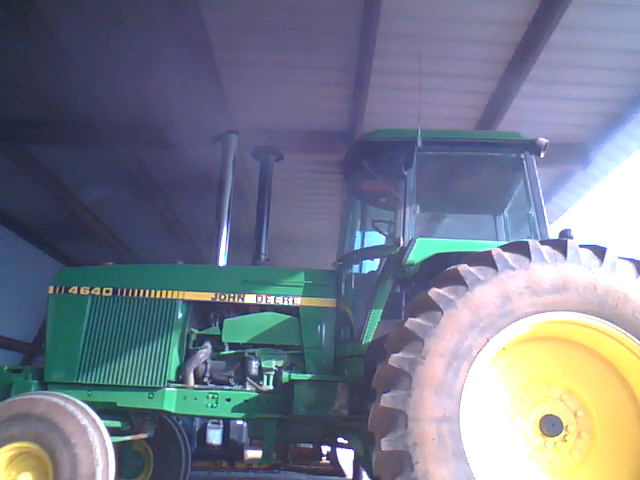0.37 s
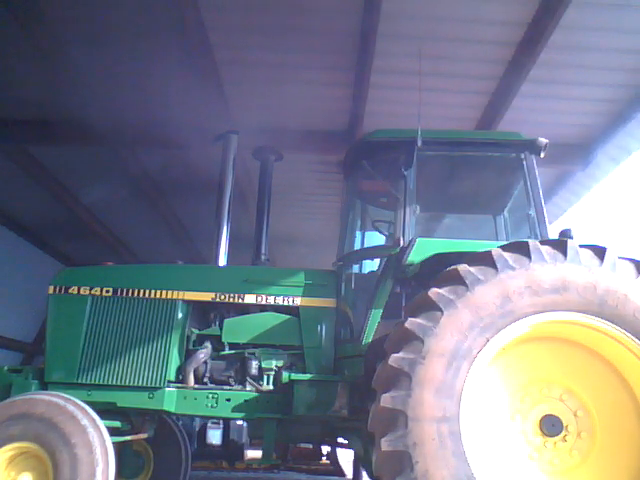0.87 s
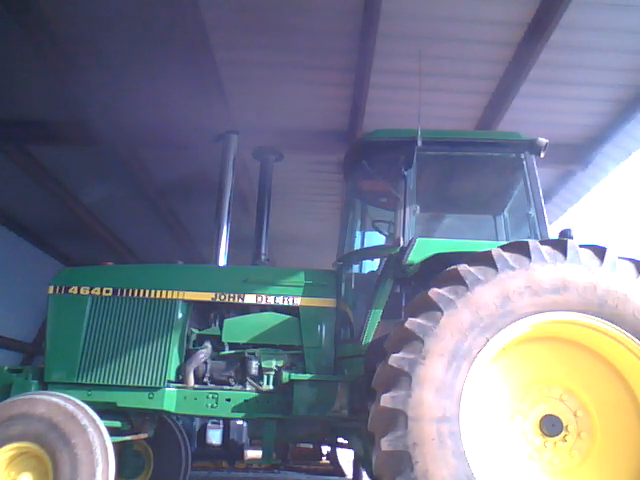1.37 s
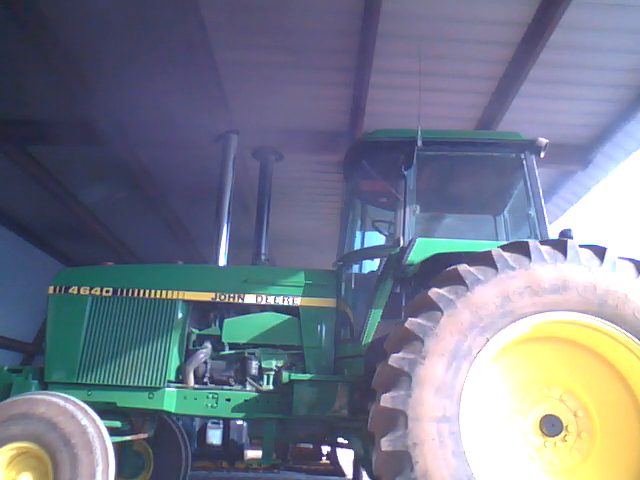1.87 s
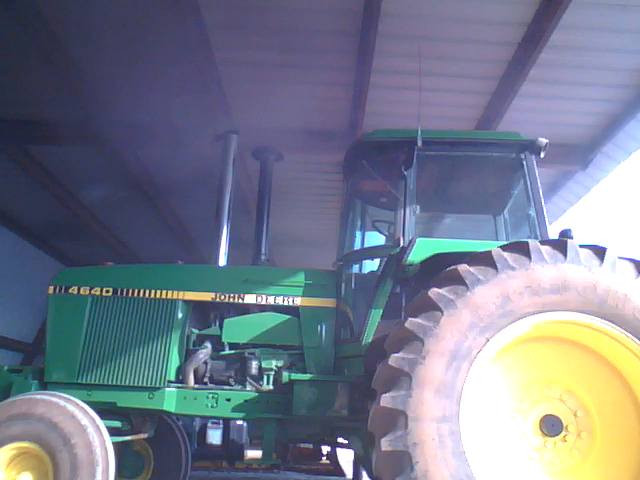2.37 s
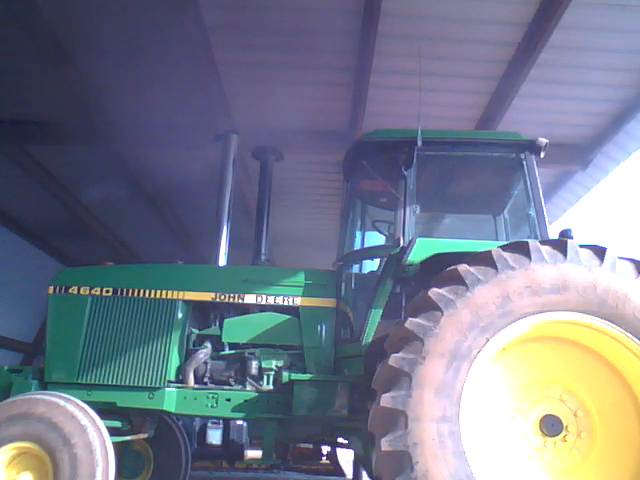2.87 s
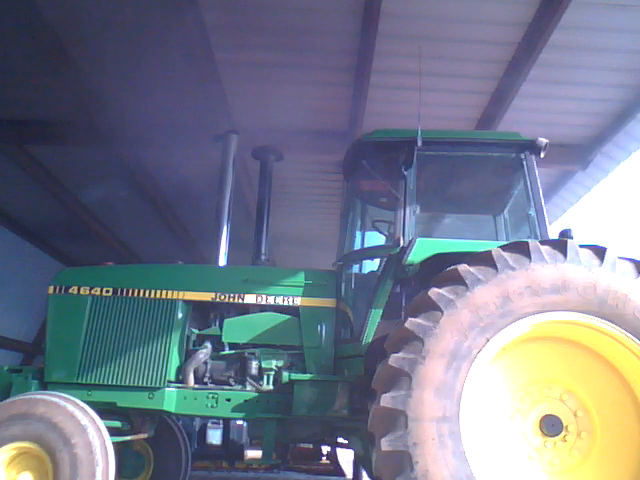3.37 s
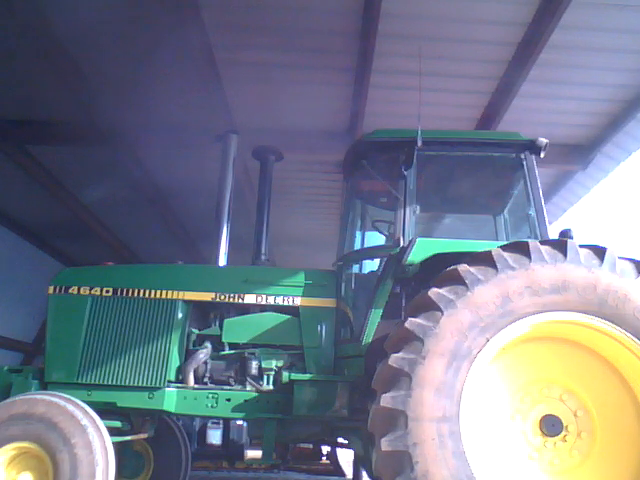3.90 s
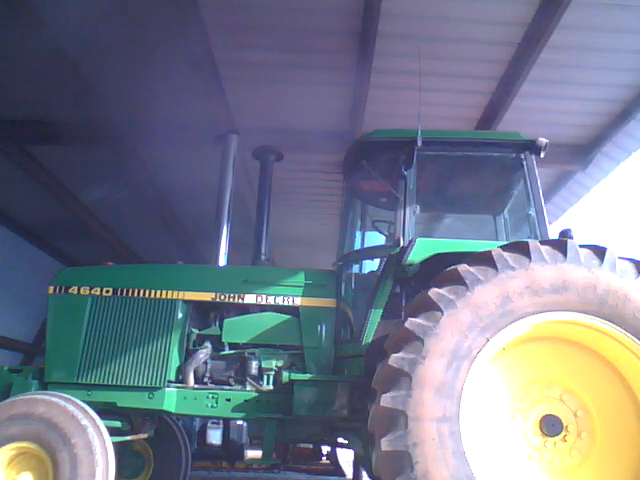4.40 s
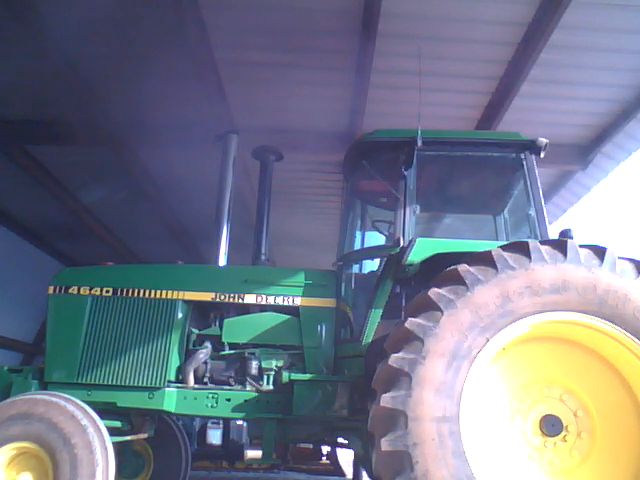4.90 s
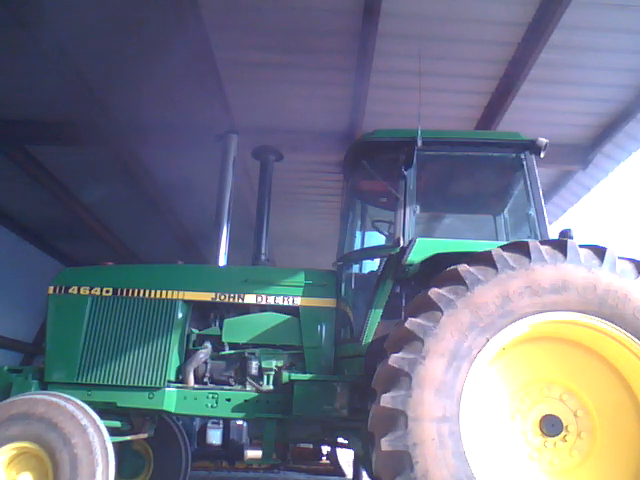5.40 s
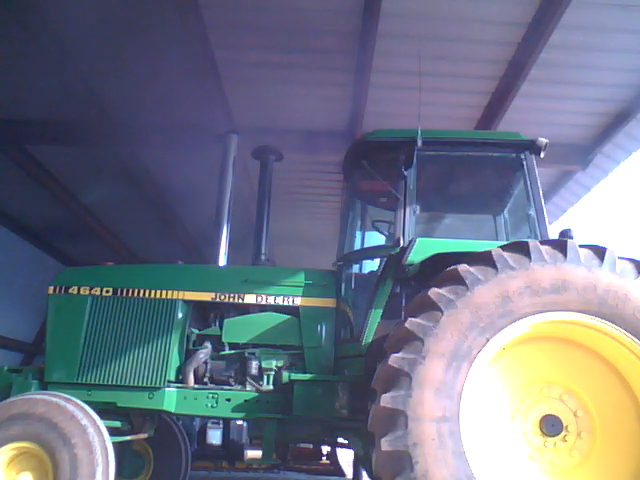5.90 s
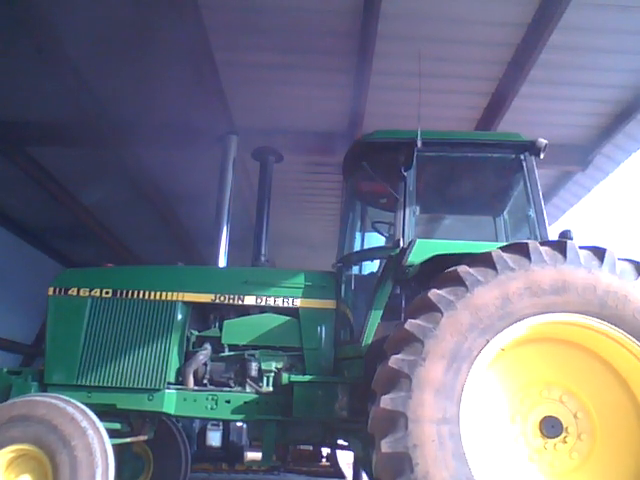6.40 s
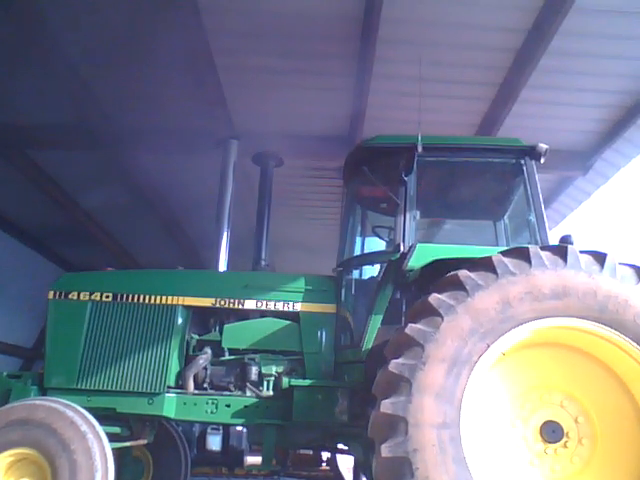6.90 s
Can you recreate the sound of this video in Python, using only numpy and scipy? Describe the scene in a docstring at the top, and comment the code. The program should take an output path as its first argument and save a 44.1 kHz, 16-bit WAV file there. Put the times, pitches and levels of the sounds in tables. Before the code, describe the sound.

Close, continuous diesel tractor idle in a metal shed: lumpy low-mid thuds, rattling valve clatter, steady hum and whine, easing slightly near the end.

```python
"""A six-cylinder diesel tractor idles under a sheet-metal roof, heard at two close microphone ports.
From the start each engine cycle repeats the same blows on a ringing block, with noisy valve clatter,
exhaust and shaft tones, a gear whine, fan rush and the roof's answer. In the first three seconds the idle
quickens slightly and the whine grows, then the speed hunts a little; near six seconds the whine drops,
and the clatter is weaker to the end. A delayed cross-feed between the ports widens the sound."""
import sys
import numpy as np
from scipy import signal
from scipy.fft import rfft, irfft, next_fast_len
from scipy.io import wavfile
from scipy.ndimage import uniform_filter1d, map_coordinates

SR = 44100
rng = np.random.default_rng(int(sys.argv[2]) if len(sys.argv) > 2 else 0)


def generate_wav(sig):
    """Save sig (samples, or channels by samples) to the path in sys.argv[1] as 16-bit PCM at SR."""
    pcm = np.round(np.clip(np.atleast_2d(sig).T, -1, 1) * 32767).astype(np.int16)
    wavfile.write(sys.argv[1], SR, pcm)


def level_to_linear(level):
    """Convert decibel levels to linear amplitude factors, elementwise."""
    exponent = np.asarray(level, float) / 20
    return 10 ** exponent


N = 309537

# All levels are those of the parts, before the two ports are formed.
# crankshaft speed, hunting a little under the governor: time_s, speed_rpm
SPEED = [(0, 748.32), (2.3, 750.3), (2.9, 757.86), (3.5, 754.23), (4.55, 759.58), (5.1, 754.04),
         (5.8, 758.37), (7.2, 757.83)]
START_DEGREES, IDLE_RPM = -9, 754  # crank angle at the start; speed that counts as plain idle
# slow swell of the engine, before each source's own offset: time_s, body_db, clatter_db
SWELL = [(0, -16, -32), (1.0, -17, -32.5), (1.9, -17, -32), (3.1, -17, -32), (4.2, -16.5, -32),
         (5.4, -16.5, -31), (6.3, -17, -33.5), (6.75, -15.5, -34), (7.02, -16.5, -36)]
BODY_FLUTTER_DB, CLATTER_FLUTTER_DB = 0.5, 1  # random unevenness on top of the swell
# blows within one cycle, relative levels: crank_degrees, thud_db (at 250 Hz), knock_db (at 520 Hz),
# clank_db (from 640 Hz up), place_along_block (0 to 1)
BLOWS = [(-12, 12, -9, 1, .02), (45, -8, -8, -5, .63), (88, 2, 14, 0, .135), (120, -3, -6, -5, .71),
         (170, -2, -4, -4, .37), (215, -4, -2, 3.5, .86), (290, 0, -5, 0, .19), (330, 3, -5, 4.5, .56),
         (400, -4, -5, -3, .92), (450, 3, -6, 1, .42), (520, 0, -5, -4, .78), (560, -5, 4, 1.5, .29),
         (660, -5, -3, -3, .48)]
THUD_DB_PER_RPM = 0.6  # the blow with the heaviest thud grows as the engine runs faster
# what the block, sump and bonnet ring with, relative levels: pitch_hz, level_db, fade_by_60_db_s
BLOCK_MODES = [(175, -23, 0.066), (220, -20, 0.03), (250, 3, 0.035), (286, 9, 0.05), (320, 7, 0.03),
               (403, 8, 0.02), (483, -4, 0.06), (502, 3, 0.085), (539, 1, 0.075), (585, 1, 0.041),
               (626.3, 3.5, 0.039), (689, 2, 0.058), (752, -1.5, 0.047), (805, 0, 0.034),
               (905.8, -4.5, 0.064), (1014, -4, 0.058), (1103.3, -3, 0.047), (1227, -13.5, 0.12),
               (1327, -9, 0.055), (1446, -6.5, 0.069), (1555, -12, 0.073), (1634, -10, 0.052),
               (1802, -12, 0.067), (1968, -25.5, 0.21)]
# valve and injector clatter, one burst a firing, relative levels: crank_degrees, level_db
BURSTS = [(-15, 2.5), (113, 0.5), (216, 4), (336.5, 2.5), (457, -3), (602, 1)]
# colour in which the clatter noise is heard, relative levels; the narrow hole near 2.8 kHz
# is not the clatter's own: pitch_hz, level_db_per_hz
CLATTER_AS_HEARD = [(400, -15), (1000, 8.5), (2000, 5), (2480, 4), (2800, -30), (2880, 1), (4000, -9.5),
                    (5000, -3.5), (6000, -4.5), (8000, -3), (10000, -11.5), (12300, -24.5), (13000, -21),
                    (13500, -31), (14000, -29), (15000, -33), (15300, -120)]
# steady tones locked to the engine: order_per_cycle, average_level_db_rms
STEADY_TONES = [(6, -47), (8, -60), (10, -63), (12, -38.5), (16, -64), (17, -64), (18, -39), (19, -60),
                (20, -52), (21, -52), (22, -41.5), (24, -40), (25, -55), (26, -37), (28, -40.5), (31, -41),
                (32, -34.5), (33, -42.5), (49, -37.5), (58, -41), (67, -47.5), (71, -48), (96, -46),
                (108, -41.5), (123, -39), (133, -40)]
# tones whose strength follows the speed as they slide along the block's resonances, one column each:
STRONG_ORDERS = [30, 66, 72, 92, 120]  # order_per_cycle
STRONG_DB = [-26, -33.5, -43, -38, -36.5]  # level_at_idle_db_rms
STRONG_DB_PER_RPM = [0.34, -0.4, 0.53, 0.64, 0.77]  # change_db_per_rpm
# average strength of the gear whine: time_s, level_db_rms
WHINE_LEVEL = [(0, -40.5), (2.2, -38.5), (2.7, -37.5), (5.5, -37.5), (6.1, -45), (7.02, -43)]
GEAR_ORDER = 373  # whine waves per engine cycle
# colour in which the fan noise is heard, relative levels; the narrow hole near 2.8 kHz
# is not the fan's own: pitch_hz, level_db_per_hz
FAN_AS_HEARD = [(20, -23), (60, -26), (120, -11), (250, 2), (600, -9.5), (1000, -2.5), (2000, -11.5),
                (2480, -12.5), (2800, -40), (2880, -16), (3450, -16.5), (4300, -20.5), (5000, -20),
                (6000, -19.5), (8000, -22), (9500, -35.5), (11000, -39), (13000, -49), (15000, -51),
                (15300, -120)]
# how long the roof's answer lasts: pitch_hz, fade_by_60_db_s
SHED_FADE = [(150, 0.7), (1000, 1), (4000, 0.35), (12000, 0.045)]
# difference of the two ports against their sum: pitch_hz, level_db, share_following_sum (0 to 1), phase_rad
PORTS = [(40, -24, .3, -.7), (200, -15.5, .4, -1.2), (500, -13.5, .55, -1.5), (1000, -5.5, .4, -1.7),
         (1700, -1, .3, -1.9), (3000, 0, .35, -2.4), (6000, 1.5, .5, -3), (8000, .5, .5, -3),
         (10000, 3.5, .5, -3), (13000, 1, .5, -3)]
CROSS_DELAY_S = 17 / 44100


def unit(x):
    """Scales a sound to rms 1."""
    return x / np.sqrt(np.mean(x ** 2) + 1e-20)


def along(points, hz):
    """Reads each column of a table by pitch, on a log axis."""
    f, *columns = np.transpose(points)
    return [np.interp(np.log(hz + 1), np.log(f + 1), column) for column in columns]


def curves(rows):
    """Gives one value per sample for each column after the time."""
    s, *columns = np.transpose(rows)
    return [np.interp(np.arange(N) / SR, s, column) for column in columns]


def wobble(rate):
    """Draws a smooth random curve through `rate` random points a second."""
    coarse = np.arange(0, N + 32, 32)
    points = rng.standard_normal(int(N * rate / SR) + 4)
    return np.interp(np.arange(N), coarse, map_coordinates(points, [coarse * rate / SR]))


def filtered(x, response):
    """Changes the strength and phase of each frequency by a complex response."""
    m = next_fast_len(N + 8192)
    return irfft(rfft(x, m) * response(np.fft.rfftfreq(m, 1 / SR)), m)[..., :N]


def hiss(colour, patchy_db):
    """Makes two unrelated coloured noises, rms 1, that share random patches of louder and softer sound."""
    grains = signal.stft(rng.standard_normal((2, N)), nperseg=128)[2]
    patches = rng.standard_normal(grains.shape[1:])
    for axis in (0, 1):  # smooth over pitch, then over time
        patches = uniform_filter1d(patches, size=5, axis=axis)
    patchy = signal.istft(grains * level_to_linear(patchy_db * unit(patches)), nperseg=128)[1][:, :N]
    return unit(filtered(patchy, lambda hz: level_to_linear(along(colour, hz)[0])))


def cycles():
    """Adds up the crank speed into engine cycles turned, two crank turns each."""
    return START_DEGREES / 720 + np.cumsum(curves(SPEED)[0]) / 120 / SR


def faster_rpm():
    """Speed above idle, averaged over a second."""
    return uniform_filter1d(curves(SPEED)[0], size=SR) - IDLE_RPM


def train(turned, degrees, db, jitter_s, scatter_db, drift):
    """Places one impulse each cycle at a crank angle; timing and size scatter, and both drift slowly too."""
    at = np.flatnonzero(np.diff(np.floor(turned - degrees / 720)))
    slow = drift * np.array([wobble(0.8)[at], wobble(0.58)[at]])
    late, size = rng.standard_normal((len(at), 2)).T + slow
    moved = np.clip(at + np.round(jitter_s * late * SR).astype(int), 0, N - 1)
    return np.bincount(moved, level_to_linear(db + scatter_db * size), N)


def blows(turned):
    """Blows ring the block's modes; each keeps its own mix, and timing scatter blurs the treble's repeat."""
    t = np.arange(SR // 8)[:, None] / SR
    hz, mode_db, t60 = np.transpose(BLOCK_MODES)
    soft_start = 1 - np.exp(-t[:, 0] / 0.0048)
    heaviest_db = max(row[1] for row in BLOWS)
    out = np.zeros(N)
    for degrees, thud_db, knock_db, clank_db, place in BLOWS:
        reach_db = along([(250, thud_db), (520, knock_db), (640, clank_db)], hz)[0]
        # how far each mode moves at the place that is struck
        shape = np.cos(np.pi * place * np.arange(len(hz)))
        modes = shape * level_to_linear(mode_db + reach_db - 60 * t / t60) * np.sin(2 * np.pi * hz * t)
        ring = modes.sum(axis=1) * soft_start
        hits = train(turned, degrees, 0, jitter_s=0.00012, scatter_db=1.4, drift=0.3)
        if thud_db == heaviest_db:
            hits = hits * level_to_linear(THUD_DB_PER_RPM * faster_rpm())
        out += signal.oaconvolve(hits, ring)[:N]
    return unit(out)


def clatter(turned):
    """Fresh metallic noise rises fast at each firing, then fades at a rate of 60 dB in 0.12 s."""
    t = np.arange(SR // 10) / SR
    kicks = sum(train(turned, degrees, db, jitter_s=0.00042, scatter_db=1.5, drift=0.1)
                for degrees, db in BURSTS)
    burst = level_to_linear(-60 * t / 0.12) * (1 - np.exp(-t / 0.0025))
    gate = signal.oaconvolve(kicks, burst)[:N]
    roughness = level_to_linear(0.96 * wobble(250))
    return unit(gate * roughness * hiss(CLATTER_AS_HEARD, patchy_db=1.1))


def engine_tone(turned, order, db):
    """One sine turns a set number of times per engine cycle, with a slightly wavering phase."""
    phase = 2 * np.pi * (order * turned + rng.random()) + 0.34 * wobble(3.6)
    return level_to_linear(db) * np.sqrt(2) * np.sin(phase)


def tones(turned):
    """Exhaust and shaft orders sound as sines, each wavering; the strong ones also follow the speed."""
    faster = faster_rpm()
    out = np.zeros(N)
    for order, db in STEADY_TONES:
        out += engine_tone(turned, order, db + 2.0 * wobble(2.58))
    for order, db, slope_db in zip(STRONG_ORDERS, STRONG_DB, STRONG_DB_PER_RPM):
        out += engine_tone(turned, order, db + slope_db * faster + 1.35 * wobble(3.02))
    return out


def whine(turned):
    """Gear teeth mesh into a tone; each firing twists the shaft and splits it into side lines."""
    firing_twist = 1.1 * np.sin(2 * np.pi * 6 * turned + 1.2 * wobble(2.51))  # six firings a cycle
    twist = firing_twist + 0.5 * wobble(10)
    level_db = curves(WHINE_LEVEL)[0] + 1.8 * wobble(6)
    return level_to_linear(level_db) * np.sqrt(2) * np.sin(2 * np.pi * GEAR_ORDER * turned + twist)


def fan():
    """The fan's air rush is steady coloured noise with a slightly patchy texture."""
    return hiss(FAN_AS_HEARD, patchy_db=1.5)


def shed(x):
    """The roof answers with two unrelated noise tails, each frequency dying at its own speed."""
    hz, t, grains = signal.stft(rng.standard_normal((2, SR // 2)), SR, nperseg=256)
    t60 = along(SHED_FADE, hz)[0][:, None]
    tail = signal.istft(grains * level_to_linear(-60 * t / t60), SR, nperseg=256)[1]
    delayed = np.pad(x, (400, 0))[None]  # the answer comes 400 samples late
    return signal.oaconvolve(delayed, tail / np.linalg.norm(tail[0]), axes=1)[:, :N]


def port_difference(shared, diffuse):
    """What differs between the ports: part is the shared sound turned in phase, the rest is unrelated."""
    def mix(hz):
        db, share, phase = along(PORTS, hz)
        following = np.sqrt(share) * np.exp(1j * phase)
        return level_to_linear(db) * np.array([following, np.sqrt(1 - share)])
    return filtered(np.array([shared, diffuse]), mix).sum(axis=0)


def scene():
    """Adds the engine, fan and roof, then forms the two ports from what they share and what differs."""
    turned = cycles()
    body_db, clatter_db = curves(SWELL)
    body_db = body_db + BODY_FLUTTER_DB * wobble(5.04)
    clatter_db = clatter_db + CLATTER_FLUTTER_DB * wobble(4.83)
    block = level_to_linear(body_db - 5) * blows(turned)
    noise = level_to_linear(clatter_db - 2) * clatter(turned) + level_to_linear(body_db - 11) * fan()
    wet = shed(block)
    shared = block + noise[0] + tones(turned) + whine(turned) + level_to_linear(-8) * wet[0]
    diffuse = noise[1] + level_to_linear(-3) * wet[1]
    apart = port_difference(shared, diffuse)
    return np.array([shared + apart, shared - apart])


def band_limit(x):
    """A steep low-pass at the top of the band."""
    return signal.sosfilt(signal.butter(12, 16320, fs=SR, output="sos"), x)


def record(dry):
    """Each channel loses a delayed copy of the other port, which combs the middle and the sides in turn."""
    late = filtered(dry[::-1], lambda hz: np.exp(-2j * np.pi * hz * CROSS_DELAY_S))
    return band_limit(dry - late)


dry = scene()
out = record(dry)
generate_wav(out)
```